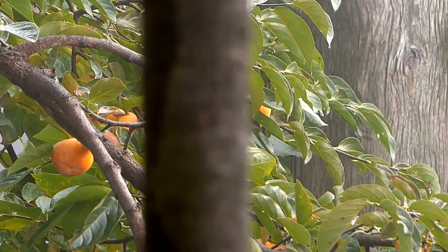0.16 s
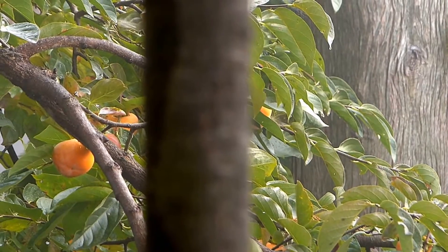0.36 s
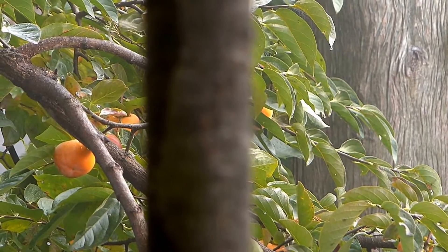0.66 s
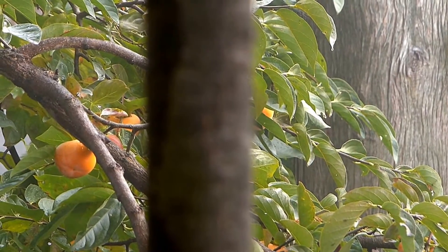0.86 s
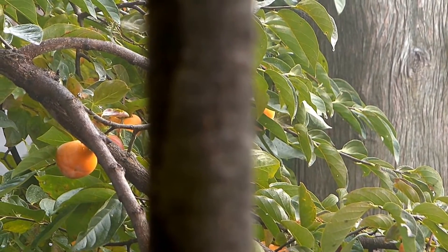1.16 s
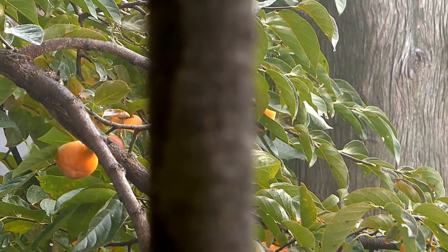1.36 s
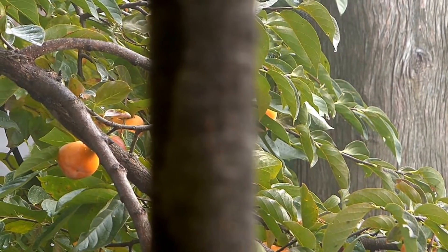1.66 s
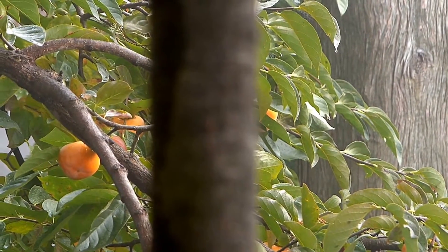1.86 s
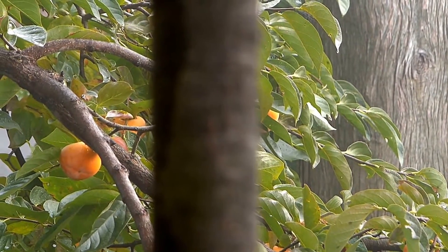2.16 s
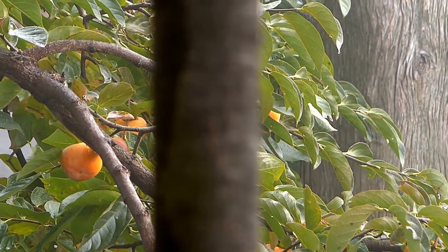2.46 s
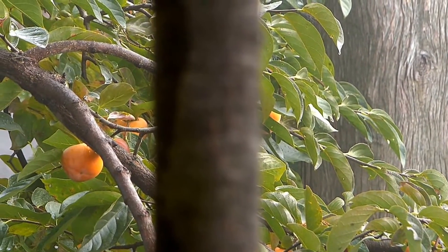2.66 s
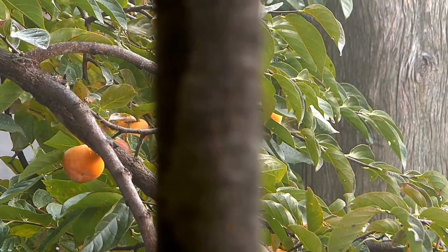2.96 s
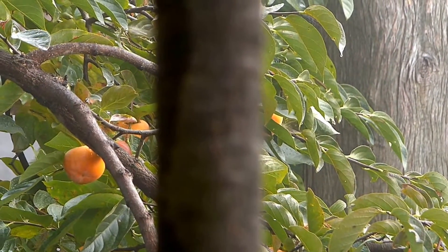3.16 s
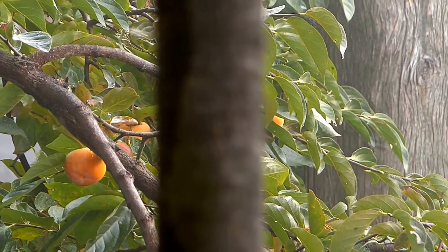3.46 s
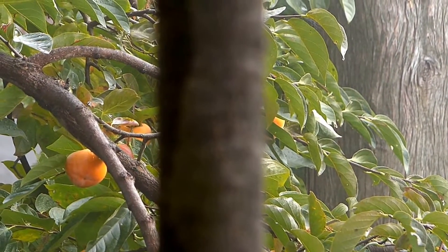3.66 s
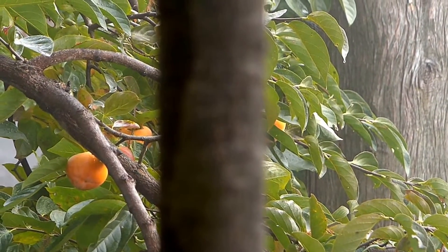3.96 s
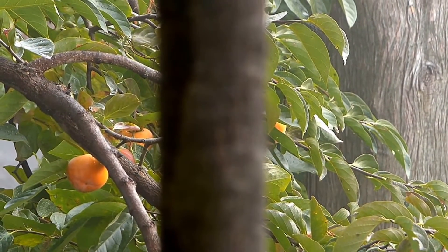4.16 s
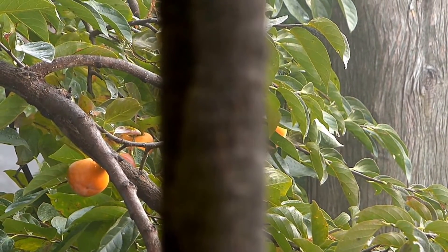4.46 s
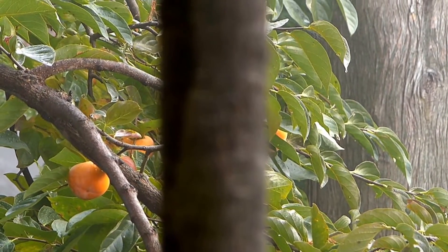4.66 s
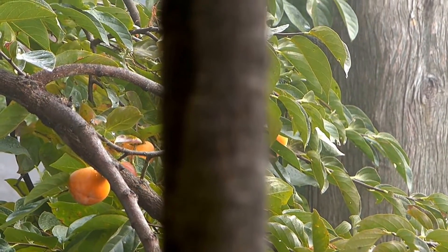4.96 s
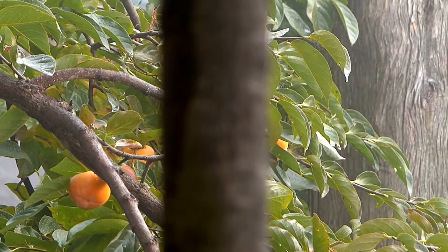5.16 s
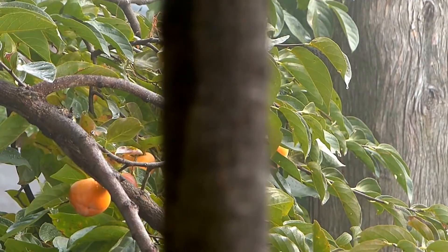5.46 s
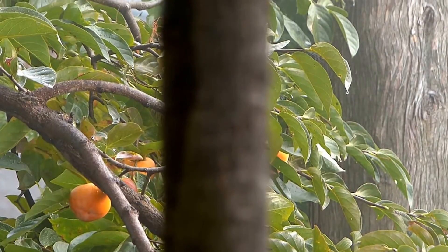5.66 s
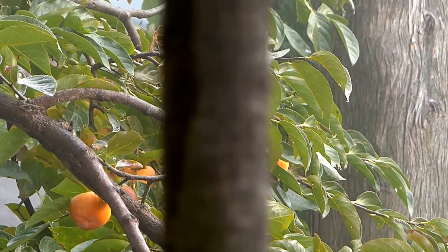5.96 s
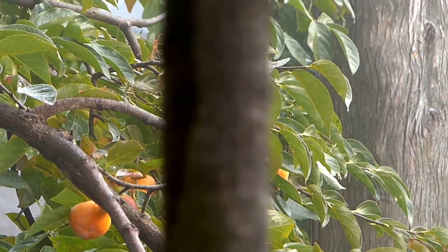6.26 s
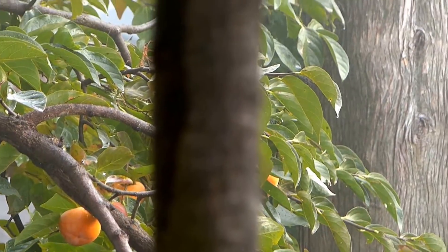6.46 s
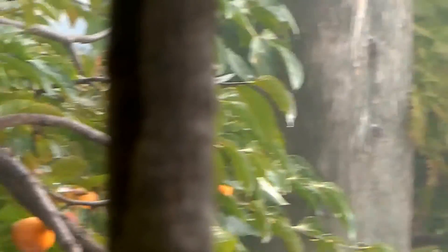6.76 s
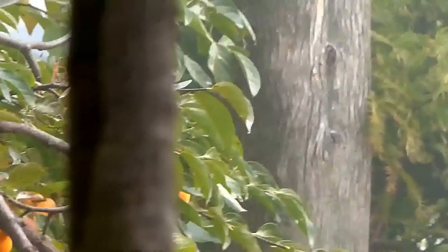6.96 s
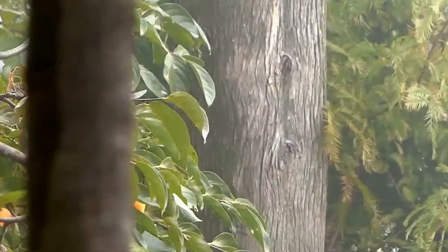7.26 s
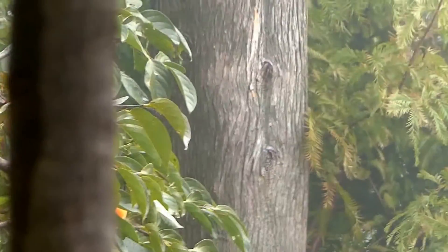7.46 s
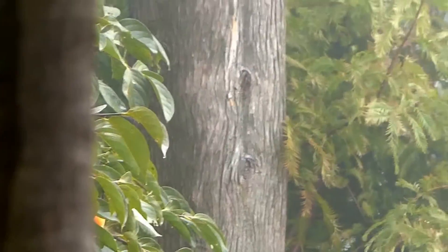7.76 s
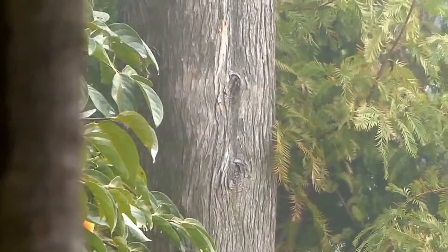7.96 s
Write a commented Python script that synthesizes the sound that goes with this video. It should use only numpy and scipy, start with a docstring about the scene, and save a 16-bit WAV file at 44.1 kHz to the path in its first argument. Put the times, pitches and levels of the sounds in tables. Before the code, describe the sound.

A quiet residential garden with far traffic, low machine hum, faint hiss and soft wind rumble, slightly stronger on the right. From 0 to 0.65 seconds a small distant bird twitters in thin, high, sliding chirps; a soft dull bump sounds close by at 0.2. At 1.2 to 1.7 a shrike gives four soft rough notes, with another bump at 1.3. From 2.1 to 5.9 it chatters harshly, about eight very short notes a second, each a buzzy quickening pulse breaking into rasp and dropping in pitch, loudest around 4 to 4.7, with short leafy echoes. Muffled bumps come at 5.2 and 5.9. The breeze then strengthens and a faint low drone enters near 6.5 and holds. Stray rasps follow at 6.6, 6.7, 7.3, 7.4, 7.55 and about 8. Dry ticks click at 7.0, faintly, and 7.35, clearer; the far twitter returns briefly at 7.7.

```python
"""A small bird twitters far off at once, then a soft bump close by; three more bumps follow later.
A shrike in a garden tree gives four soft notes, a long harsh chatter, then a few stray notes.
Each note is a quickening train of syrinx puffs, tone breaking into rasp; leaves and house walls answer.
The low hum of the town and wind rumble run throughout; the breeze picks up as the chatter ends.
Then a low drone sets in and holds, two dry ticks sound close by, and the twitter returns."""
import sys
import numpy as np
from scipy import signal
from scipy.fft import rfft, irfft, next_fast_len
from scipy.io import wavfile
from scipy.ndimage import uniform_filter1d, map_coordinates

SR = 44100
rng = np.random.default_rng(int(sys.argv[2]) if len(sys.argv) > 2 else 0)


def waveform_to_disk(signal):
    """Save audio, clipped to [-1, 1], as 16-bit WAV at the path in sys.argv[1]."""
    frames = np.transpose(np.atleast_2d(signal))
    scaled = np.clip(frames, -1, 1) * 32767
    samples = np.round(scaled).astype(np.int16)
    wavfile.write(sys.argv[1], SR, samples)


N = 357651

# shrike notes: t/s, length/s, f/Hz, level/dB before the voice trim, harshness (1 = full rasp)
SHRIKE_NOTES = [(1.23, 0.049, 1497, -53, 1.2), (1.381, 0.04, 1502, -51.5, .9),
                (1.52, 0.035, 1520, -49.5, .7), (1.643, 0.046, 1494, -49.5, 0.84),
                (2.076, 0.041, 1482, -49.5, 0.79), (2.206, 0.029, 1618, -43.5, .3),
                (2.326, .039, 1736, -43.5, 0.68), (2.435, 0.041, 1833, -41.5, 1.25),
                (2.556, 0.045, 1774, -43, 0.89), (2.684, 0.052, 1854, -44, 1.1),
                (2.824, 0.051, 1820, -45.5, 0.98), (2.972, 0.049, 1770, -44.5, 1.2),
                (3.094, .043, 1796, -42, 1.05), (3.231, 0.034, 1818, -42, 0.74),
                (3.352, 0.036, 1810, -41.5, 0.67), (3.476, 0.035, 1842, -41, 0.74),
                (3.596, 0.04, 1853, -41.5, 0.64), (3.717, 0.044, 1838, -40.5, 1.13),
                (3.832, 0.043, 1950, -38, 1.13), (3.96, 0.044, 1906, -38, 1.17),
                (4.084, .044, 1804, -38.5, 1.4), (4.213, 0.048, 1730, -38, 0.97),
                (4.391, .037, 1695, -39, 0.91), (4.535, 0.037, 1710, -37, 0.73),
                (4.652, 0.038, 1744, -38.5, 1.3), (4.771, 0.048, 1637, -40, 1.2),
                (4.907, 0.041, 1644, -39.5, 0.89), (5.031, 0.038, 1707, -40.5, 1.17),
                (5.168, .037, 1643, -42, 1.2), (5.304, .037, 1676, -42, 1.4),
                (5.418, 0.042, 1660, -42.5, 1), (5.522, 0.045, 1653, -41, 1.07),
                (5.662, 0.037, 1657, -41, 1.2), (5.765, 0.053, 1475, -41.5, 0.37),
                (5.905, 0.061, 1683, -40, 0.92), (6.592, 0.05, 1620, -44, 1.05),
                (6.719, .042, 1818, -41, 0.96), (7.25, 0.035, 1615, -45, 0.94),
                (7.376, 0.034, 1670, -42, 1.05), (7.552, 0.028, 1632, -42, 0.76),
                (7.95, .039, 1650, -43, 1.13), (8.102, 0.044, 1610, -43, 0.91)]
# how wide the beak opens: t/s, brightness level/dB
BEAK_OPENING = [(1.2, -4), (1.6, -6), (2.3, -8.5), (2.43, -1), (2.8, 2), (3.3, -2), (4.08, -1), (4.4, -5.5),
                (4.65, -0.5), (5.3, -0.5), (5.66, 4.5), (5.77, -0.5), (7.4, 3), (8.1, 4.5)]
THROAT_PITCH_HZ = 1784   # the pitch at which the throat has its plain shape
BRIGHTER_DB_PER_OCTAVE = 15   # higher notes are brighter
# fundamental: level of an ordinary note's; dB lost per dB of extra effort; dB gained per dB of brightness
FUNDAMENTAL_DB, ORDINARY_NOTE_DB, EFFORT_THINS, BEAK_LIFTS = 1.3, -41, 0.56, 0.69


def shrike(voice_db=0.5):
    """All notes at the bird: open beak and high pitch brighten, force thins the fundamental."""
    out = np.zeros(N)
    for start, length, pitch_hz, level_db, harsh in SHRIKE_NOTES:
        beak_db = np.interp(start, *np.transpose(BEAK_OPENING))
        bright_db = beak_db + BRIGHTER_DB_PER_OCTAVE * np.log2(pitch_hz / THROAT_PITCH_HZ)
        effort_db = level_db - ORDINARY_NOTE_DB
        low_db = FUNDAMENTAL_DB - EFFORT_THINS * effort_db + BEAK_LIFTS * bright_db
        call = note(length, pitch_hz, bright_db, low_db, harsh)
        add(out, start, from_db(level_db + voice_db) * call)
    return out


# one note arches, then falls as it breaks up:
# t/share of length, pitch ratio before sag, level/dB, chaos (0-1) before harshness
NOTE_GESTURE = [(0, .985, -3.5, 0.18), (.3, 1.015, 0, .22), (.53, 1.0, 0.9, 0.44), (.76, .93, -1.5, .66),
                (1, .84, -7, 0.76)]


def note(length, pitch_hz, bright_db, low_db, harsh,
         first_puffs_hz=112, quickening=1900,   # puff rate at the start, its rise in Hz per second
         open_share=0.731, gap_db=-20, merging=1.0,   # open part of a puff; leak between puffs, its rise
         sag=0.058, bend=0.062, stray=0.0084, jitter=0.062,   # pitch movements, as shares of pitch
         flutter_db=3.5):
    """Puffs of tone come ever faster and run together as pitch sags and vibration turns chaotic."""
    t = np.arange(int(length * SR)) / SR
    share, *columns = np.transpose(NOTE_GESTURE)
    ratio, level_db, chaos = (np.interp(t / length, share, c) for c in columns)
    chaos = np.clip(chaos * harsh, 0, .97)

    cycle = first_puffs_hz * t + quickening * t ** 2 / 2
    cycle = cycle * (1 + 0.056 * rng.standard_normal())   # every note has its own pace
    through_puff = np.minimum(cycle % 1 / open_share, 1)
    opening = np.sqrt(np.sin(np.pi * through_puff).clip(0))
    leak = np.clip(from_db(gap_db) + merging * t / length, 0, 1)
    puffs = leak + (1 - leak) * opening

    # each puff starts sharp and slides flat as its pressure is spent; pitch also strays by chance
    slide = bend * (.5 - through_puff) + stray * harsh * wander(123, len(t))
    hz = pitch_hz * (ratio - sag * chaos ** 2 + slide)
    rough_hz = hz * (1 + jitter * chaos * wander(1098, len(t)))
    phase = 2 * np.pi * np.cumsum(rough_hz) / SR

    # the partials flare as they slide through the resonances of the throat
    tone = 0
    for k in range(1, 7):
        flutter = flutter_db * wander(252, len(t))
        gain = from_db(throat(k * hz, pitch_hz, bright_db, low_db) + flutter)
        partial = np.sin(k * phase + rng.uniform(0, 2 * np.pi))
        tone = tone + uniform_filter1d(gain, size=30) * partial

    bands = np.geomspace(400, 16000, 120)
    rasp = noise(np.c_[bands, throat(bands, pitch_hz, bright_db, low_db)], len(t))
    voice = np.sqrt(1 - chaos) * rms_one(tone) + np.sqrt(chaos) * rasp
    closing = np.clip((length - t) / 0.00074, 0, 1)
    return rms_one(voice * puffs * from_db(level_db) * closing)


# how throat and open beak colour tone and rasp alike: f/Hz, relative level/dB
THROAT_COLOUR = [(700, -46), (1150, -11.5), (1550, -9.5), (1850, -12), (2100, -12), (2650, -4.5),
                 (3050, -6), (3430, 1.5), (4050, -2.5), (4450, -1.5), (5280, -2), (5850, -9), (6700, -9.5),
                 (7600, -19), (10500, -21.5), (14000, -27)]


def throat(hz, pitch_hz, bright_db, low_db, follows=0.41):
    """Gain in dB: resonances rise a little with pitch; a wide beak lifts all above the second partial."""
    multiple = hz / pitch_hz
    treble = np.interp(multiple, [2.15, 2.8, 4.5], [0, 1, 1.3])
    bass = np.interp(multiple, [1.2, 1.7], [1, 0])
    shrink = (pitch_hz / THROAT_PITCH_HZ) ** follows
    return at_hz(THROAT_COLOUR, hz / shrink) + bright_db * treble + low_db * bass


# colour of the garden's echo: f/Hz, relative level/dB
ECHO_COLOUR = [(800, -11), (1600, 0.5), (2600, -1.5), (3400, 0.5), (4200, 5.5), (5000, 3), (6200, -.5),
               (9000, 3), (15000, -22)]


def garden(x, leaves_t60=0.14, walls_t60=0.7, walls_db=-10, first_echo=0.0071, alike=0.54):
    """Quick scatter from the foliage, then a longer, fainter tail from the walls; times in s."""
    t = np.arange(int(.8 * SR)) / SR
    leaves = from_db(-60 * t / leaves_t60)
    walls = from_db(walls_db - 60 * t / walls_t60)
    decay = np.hypot(leaves, walls)
    decay = decay * np.clip(t / first_echo - .5, 0, 1)   # fades in around the first echo
    common = np.sqrt(alike) * noise(ECHO_COLOUR, len(t))
    sides = [common + np.sqrt(1 - alike) * noise(ECHO_COLOUR, len(t)) for side in range(2)]
    echoes = np.array(sides) * decay
    echoes = echoes / np.sqrt(np.sum(echoes ** 2))
    return signal.fftconvolve(x[None], echoes, axes=1)[:, :N]


def at_microphones(x, right_db=0.96, lag=1.0):
    """The right microphone hears it louder and a little later (lag in samples)."""
    late = map_coordinates(x, [np.arange(N) - lag], order=3)
    return np.array([x * from_db(-right_db), late * from_db(right_db)])


# far twitter: t/s, length/s, start f/Hz, end f/Hz, level/dB before distance
TWITTER_GLIDES = [(.01, .05, 3500, 3340, -63), (.115, .032, 3470, 2950, -62),
                  (0.258, 0.039, 3010, 3450, -61), (0.286, .026, 4000, 3450, -58),
                  (.405, 0.03, 3580, 3050, -66), (0.437, .03, 4300, 4170, -67),
                  (0.467, .025, 3600, 3950, -67), (0.517, 0.059, 4200, 2900, -63.5),
                  (0.607, 0.042, 2950, 3870, -67), (7.723, 0.05, 3650, 4030, -61),
                  (7.746, 0.0395, 4040, 3680, -61)]


def twitter():
    """Short pure glides of a small bird, each swelling and fading."""
    out = np.zeros(N)
    for start, length, start_hz, end_hz, level_db in TWITTER_GLIDES:
        hz = np.linspace(start_hz, end_hz, int(length * SR))
        glide = np.sin(2 * np.pi * np.cumsum(hz) / SR)
        add(out, start, from_db(level_db) * 2 * np.hanning(len(hz)) * glide)
    return out


# soft bumps close by: t/s, level/dB, decay constant/s, muffled above f/Hz, ring level/dB against the scuff
SOFT_BUMPS = [(.186, -50.5, 0.069, 1200, -11), (1.323, -50.5, 0.022, 800, -28),
              (5.16, -55, 0.075, 197, -40), (5.936, -45.5, 0.046, 2200, -30)]
# their colour before muffling: f/Hz, relative level/dB
SCUFF_COLOUR = [(40, -25), (150, 1.5), (450, -2), (900, -3), (2200, -3.5), (6000, -11)]
BUMP_RING_HZ = 2140


def bumps():
    """Dull noise scuffs that swell in a few milliseconds and die away, with a faint ring."""
    out, t = np.zeros((2, N)), np.arange(SR // 2) / SR
    for start, level_db, decay, muffle_hz, ring_db in SOFT_BUMPS:
        muffle = signal.butter(2, muffle_hz, fs=SR, output="sos")
        sides = [noise(SCUFF_COLOUR, len(t)) for side in range(2)]
        scuff = rms_one(signal.sosfilt(muffle, sides))
        ring = from_db(ring_db) * np.sin(2 * np.pi * BUMP_RING_HZ * t)
        body = scuff + 0.58 * scuff[::-1] + ring   # each side leaks into the other
        envelope = np.minimum(t / 0.0046, 1) * np.exp(-t / decay)
        add(out, start, from_db(level_db) * body * envelope)
    return out


# dry ticks: t/s, level/dB
DRY_TICKS = [(7.034, -44), (7.3465, -30)]
# ringing modes of a tick: f/Hz, relative level/dB, t60/s
TICK_RINGING = [(1620, -9, 0.0079), (2460, 0.5, 0.0053), (3263, -12, .005)]


def ticks():
    """A small hard part rings for a dozen or so cycles, as a sum of decaying modes."""
    out, t = np.zeros(N), np.arange(SR // 20) / SR
    ring = np.zeros(len(t))
    for hz, db, t60 in TICK_RINGING:
        ring -= from_db(db - 60 * t / t60) * np.sin(2 * np.pi * hz * t)
    for start, level_db in DRY_TICKS:
        add(out, start, from_db(level_db) * ring)
    return out


# puffs of air on the microphones: t/s, rumble level/dB, half-width/s (to 1/e)
AIR_PUFFS = [(.75, -56, 0.2), (1.37, -49, 0.077), (2.82, -48, .06), (5.22, -46, .05), (6.78, -46, 0.07)]
# colour of the air rumble: f/Hz, relative level/dB
RUMBLE_COLOUR = [(12, -8), (22, -2), (31, 6.5), (45, -15), (70, -24), (150, -53)]
CALM_DB, BREEZE_DB = -59.5, -55   # rumble before and after the breeze picks up
BREEZE_SWING_DB, BREEZE_SWINGS_PER_S = 2, 6
BREEZE_FROM_S, BREEZE_RISE_S = 5.76, 0.63


def wind():
    """Air rumbles on the microphones: an uneven breeze that picks up late, and a few brief puffs."""
    t = np.arange(N) / SR
    breeze_db = CALM_DB + (BREEZE_DB - CALM_DB) * sets_in(BREEZE_FROM_S, BREEZE_RISE_S)
    breeze = from_db(breeze_db + BREEZE_SWING_DB * wander(BREEZE_SWINGS_PER_S, N))
    gusts = sum(from_db(db) * np.exp(-((t - s) / width) ** 2) for s, db, width in AIR_PUFFS)
    return np.hypot(breeze, gusts) * diffuse(RUMBLE_COLOUR)


# distant machinery: f/Hz, level/dB
MACHINE_HUM = [(59.5, -68), (100, -71.5), (150.5, -69)]


def machine_hum(waver=0.48, drift=0.57):
    """Steady low tones that waver in level (share) and drift in phase (radians), each side by itself."""
    t = np.arange(N) / SR
    out = np.zeros((2, N))
    for side in out:
        for hz, db in MACHINE_HUM:
            level = from_db(db) * np.sqrt(2) * (1 + waver * wander(4.5, N))
            side += level * np.sin(2 * np.pi * hz * t + drift * wander(8, N))
    return out


# colour of the late drone: f/Hz, relative level/dB
LATE_DRONE = [(70, -33), (105, -15), (126, 0.5), (150, -2), (172, -17), (203, 0.5), (240, -22), (450, -26),
              (900, -61)]
DRONE_FROM_S, DRONE_RISE_S, DRONE_DB = 6.45, .2, -60


def drone():
    """Narrow bands of low noise that set in late and hold."""
    return from_db(DRONE_DB) * sets_in(DRONE_FROM_S, DRONE_RISE_S) * diffuse(LATE_DRONE)


# colour of the far traffic: f/Hz, relative level/dB per Hz
TOWN_COLOUR = [(25, -20), (50, -2.5), (75, -7.5), (144, -5), (227, -7.5), (358, -8.5), (450, -10.5),
               (700, -11.5), (980, -14), (1350, -14), (2100, -18.5), (3000, -20), (3500, -18),
               (4500, -20.5), (6000, -25.5), (15500, -26)]
TOWN_DB = -53
# colour of the microphone hiss: f/Hz, relative level/dB
HISS_COLOUR = [(1000, -20), (3000, 3), (8000, 0), (15500, -1)]
HISS_DB = -59.5


def background(right_db=1.0):
    """Far traffic, hum, drone and wind, louder on the right, over even microphone hiss."""
    town = from_db(TOWN_DB) * diffuse(TOWN_COLOUR) + drone() + machine_hum()
    hiss = from_db(HISS_DB) * diffuse(HISS_COLOUR)
    return (town + wind()) * from_db([[-right_db], [right_db]]) + hiss


# likeness of the two sides in sound from all round: f/Hz, left-right correlation
SIDE_LIKENESS = [(30, 0.35), (130, 0.23), (300, 0), (1400, 0.21), (4000, 0.08), (12000, 0)]


def diffuse(spectrum):
    """Stereo noise from all round, most alike in the deep bass: mid and side mixed by correlation."""
    size = next_fast_len(N)
    hz = np.fft.rfftfreq(size, 1 / SR)
    alike = np.clip(at_hz(SIDE_LIKENESS, hz), -1, 1)
    mid, side = rfft(rng.standard_normal((2, size))) * from_db(at_hz(spectrum, hz))
    both = np.sqrt(1 + alike) * mid + np.sqrt(1 - alike) * side * [[1], [-1]]
    return rms_one(irfft(both, size)[:, :N])


def noise(spectrum, size):
    """Noise of a given colour, rms 1."""
    span = max(size, 4096)
    hz = np.fft.rfftfreq(span, 1 / SR)
    coloured = rfft(rng.standard_normal(span)) * from_db(at_hz(spectrum, hz))
    return rms_one(irfft(coloured, span)[:size])


def wander(rate_hz, size):
    """A random line through normal draws, rate_hz of them per second."""
    knots = rng.standard_normal(512)
    return np.interp(np.arange(size) * rate_hz / SR, np.arange(len(knots)), knots, period=len(knots))


def sets_in(start_s, rise_s):
    """Rises from 0 to 1 and holds."""
    return np.clip((np.arange(N) / SR - start_s) / rise_s, 0, 1)


def from_db(db):
    """Decibels to amplitude."""
    return 10 ** (np.asarray(db) / 20)


def rms_one(x):
    """Scale to rms 1."""
    return x / np.sqrt(np.mean(x ** 2) + 1e-20)


def at_hz(points, hz):
    """A spectrum read on a log-frequency axis."""
    known_hz, values = np.transpose(points)
    return np.interp(np.log(hz + 1), np.log(known_hz), values)


def add(track, start_s, sound):
    """Mix a sound in from start_s."""
    at = max(round(start_s * SR), 0)
    room_left = max(track.shape[-1] - at, 0)
    track[..., at:at + sound.shape[-1]] += sound[..., :room_left]


# share of the voice thrown into the garden as the bird turns: t/s, level/dB
GARDEN_SPREAD = [(1.2, 2.5), (2.2, -1), (2.7, 1), (3.6, 0), (4.0, -4.5), (4.5, -5), (5.8, -5), (8.1, -4)]


def scene():
    """The birds sound through the garden; the small noises are close and dry."""
    spread_db = np.interp(np.arange(N) / SR, *np.transpose(GARDEN_SPREAD))
    voice, far_bird = shrike(), twitter()
    echo = garden(voice * from_db(spread_db) + 0.72 * far_bird)
    echo = echo * from_db([[-.7], [.7]])   # a little louder on the right
    direct = at_microphones(voice + 0.82 * far_bird)
    return direct + echo + bumps() + ticks() + background()


CUTOFF_HZ = 15850


def record(dry):
    """The top is cut steeply by a linear-phase low-pass."""
    low_pass = signal.firwin(401, CUTOFF_HZ, fs=SR)
    return signal.fftconvolve(dry, low_pass[None], mode="same", axes=1)


dry = scene()
out = record(dry)
waveform_to_disk(out)
```